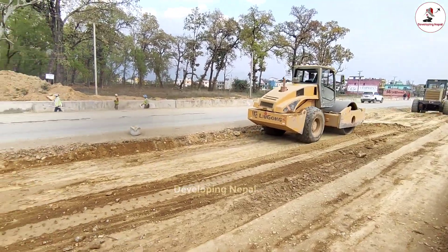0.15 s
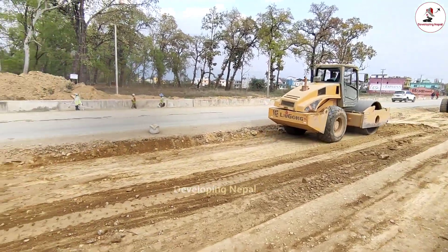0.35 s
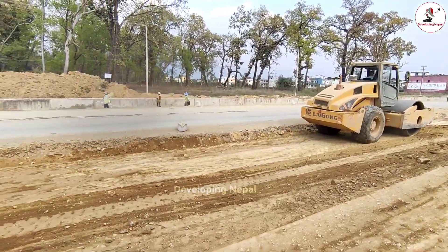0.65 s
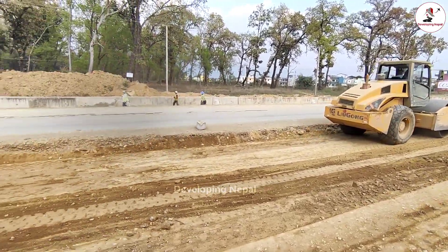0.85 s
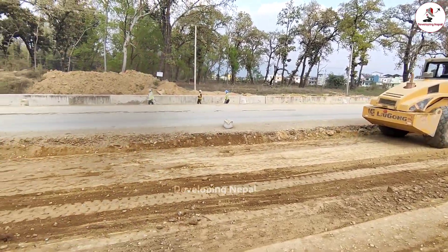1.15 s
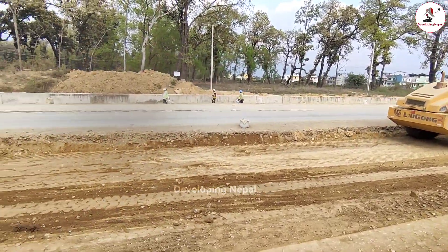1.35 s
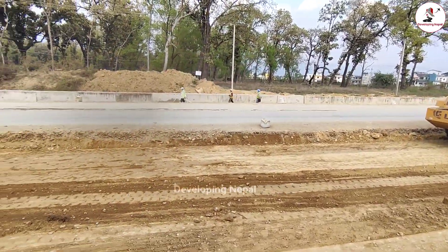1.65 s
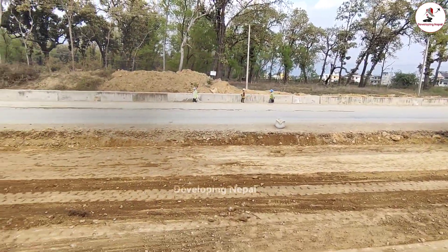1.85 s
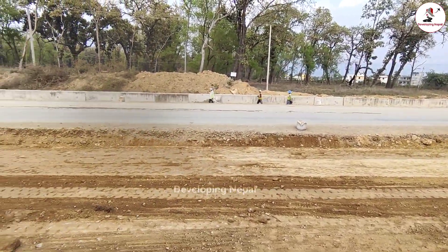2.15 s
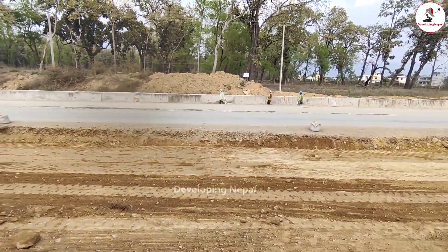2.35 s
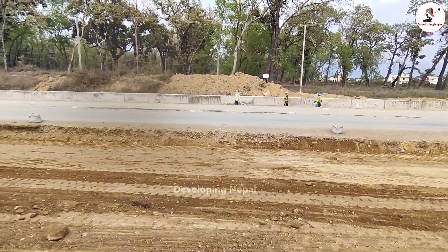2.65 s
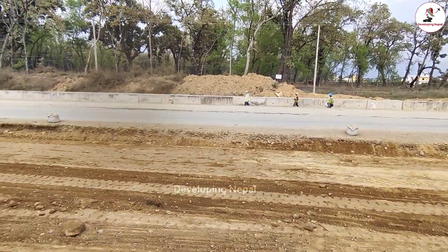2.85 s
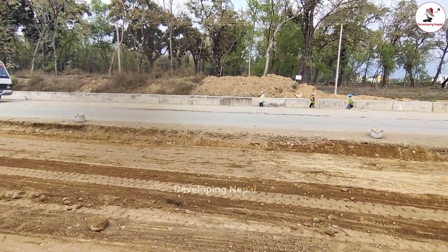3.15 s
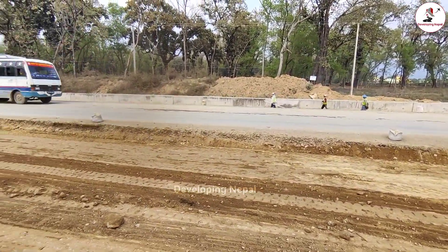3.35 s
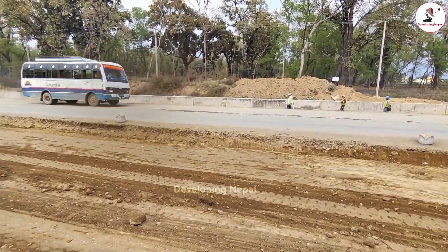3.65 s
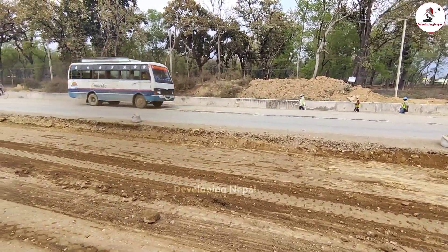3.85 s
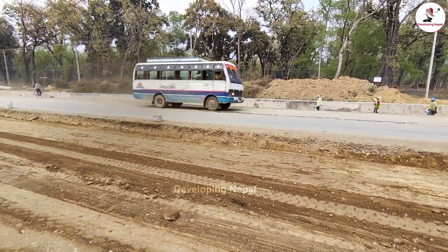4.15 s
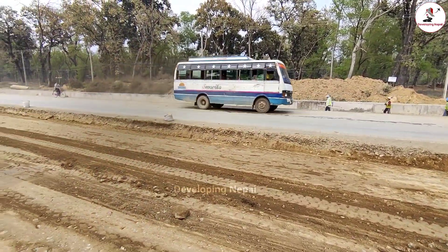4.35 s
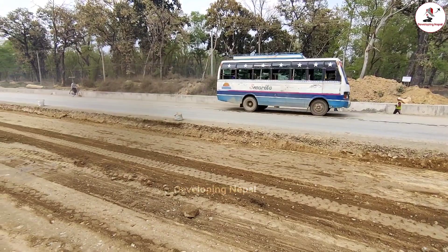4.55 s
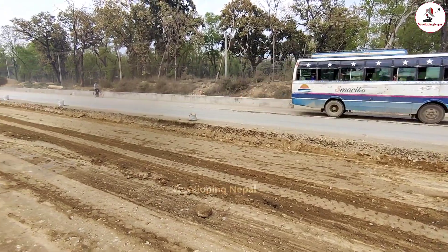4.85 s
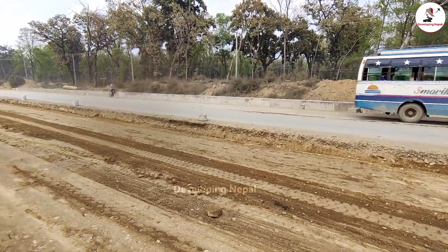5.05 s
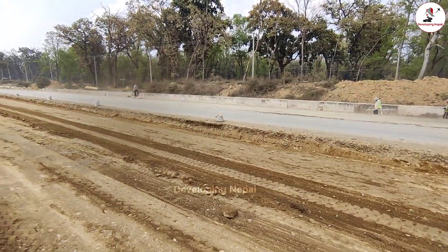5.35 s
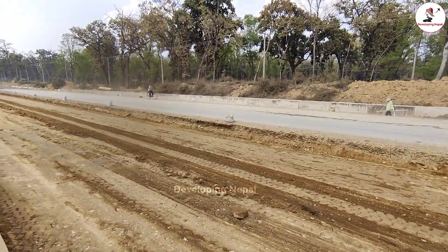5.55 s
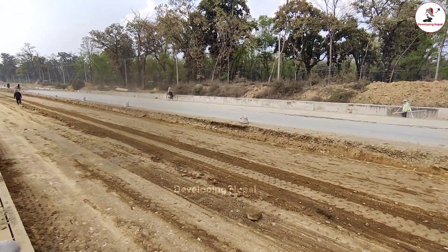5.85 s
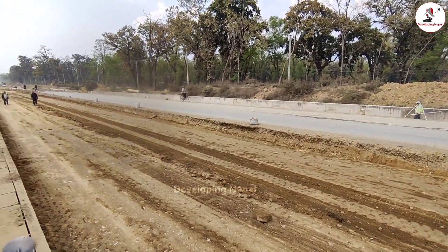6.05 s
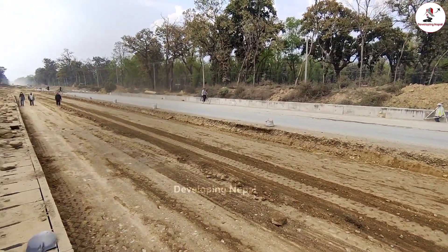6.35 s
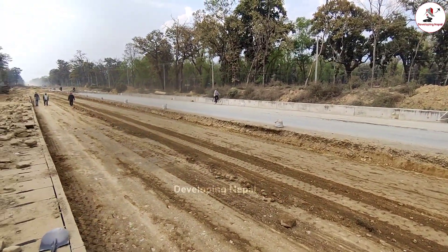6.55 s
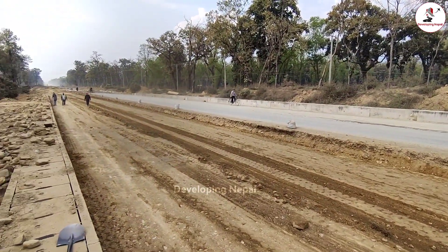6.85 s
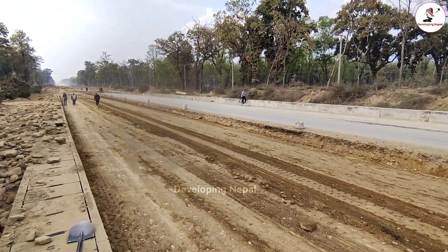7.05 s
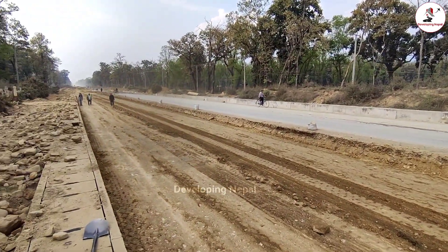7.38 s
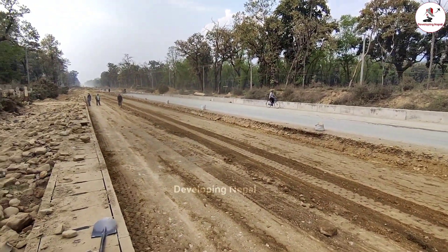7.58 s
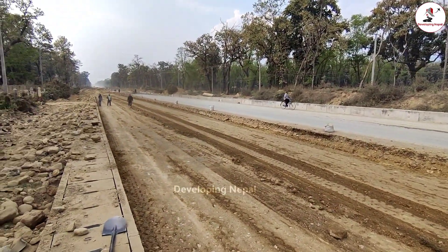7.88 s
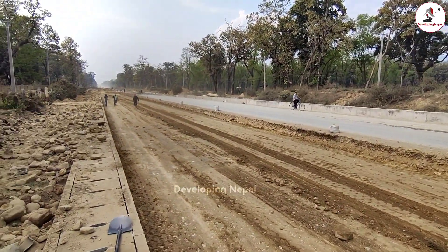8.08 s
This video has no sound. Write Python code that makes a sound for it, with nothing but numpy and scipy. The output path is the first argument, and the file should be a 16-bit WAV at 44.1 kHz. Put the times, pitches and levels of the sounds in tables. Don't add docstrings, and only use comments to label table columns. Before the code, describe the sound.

An open-air roadworks heard from one handheld microphone. From 0 seconds a heavy diesel roller dominates with a steady low drone around 100 hertz, buzzy overtones, hard engine knock, deep drum vibration and a hydraulic whine strongest before 1.5 seconds. A second machine throttles back at about 0.4 seconds and fades. As the microphone turns away, knock and whine soften; brief panel whines and short, shifting ground and wall echoes colour the roar and hiss. Around 4.2 seconds the drum vibration is let go and runs down, and the roller's drone drops sharply. A bus emerges from 3 seconds, its tyre rush peaking near 4.4 and deep exhaust boom near 5.1, then recedes. From 5.4 seconds a small motorcycle rises, roughly buzzing and wavering in pitch, peaking in pitch near 6.1 and continuing to the end, about 8.2, over a lighter engine drone, dull rumble and airy hiss.

```python
import sys
import numpy as np
from scipy import signal
from scipy.fft import rfft, irfft, next_fast_len
from scipy.io import wavfile
from scipy.ndimage import uniform_filter1d, map_coordinates

SR = 44100
rng = np.random.default_rng(int(sys.argv[2]) if len(sys.argv) > 2 else 0)


def inscribe(sig):
    pcm = np.round(np.clip(np.atleast_2d(sig).T, -1, 1) * 32767)
    wavfile.write(sys.argv[1], SR, pcm.astype(np.int16))


def gain_from_decibels(decibels):
    exponent = np.asarray(decibels, float) / 20
    return 10 ** exponent


N = 362502

# t/s, firing f/Hz, firing tone level/dB
ENGINE = [(0, 102.5, -21), (1.8, 102.8, -20), (2.4, 102.3, -20.5), (2.9, 102.2, -19.5), (3.5, 102.2, -19.5),
          (3.9, 102.6, -22), (4.2, 103.6, -26), (4.6, 108.3, -33), (5.2, 107.7, -33), (5.8, 105.8, -29),
          (6.9, 108.7, -28), (7.5, 108, -29), (8.22, 108.6, -31)]
# t/s, turn (0 roller, 1 down the road), extra path via ground/m, echo share/0-1,
# nearness/dB, phase lost at the bounce/turns
VIEW = [(0, 0.042, 0.037, 0.3, -4.5, 0.0076), (.4, 0.087, 0.07, 0.6, -2.5, 0.051),
        (.7, 0.078, 0.079, 0.4, -1.5, 0), (1, 0.099, .105, .55, -1, 0), (1.25, 0.11, 0.115, 0.4, -1, 0),
        (1.6, .2, 0.13, 0.4, 0, 0.035), (2, 0.21, .148, 0.7, -1.5, 0.046),
        (2.4, 0.25, .156, 0.5, -0.5, 0.013), (3, 0.32, .165, 0.4, -2.5, 0.16),
        (3.6, 0.36, .16, 0.35, -2, 0.14), (4.2, 0.47, .162, 0.2, -1, 0), (4.8, 0.69, .16, 0.1, -1, .05),
        (5.4, 0.64, 0.158, 0.35, -2, 0.093), (5.75, 0.72, .162, 0.2, -1.5, 0.16),
        (6.1, 0.82, .168, 0.3, -1.5, 0.18), (6.5, 0.84, .176, 0.4, -2.5, 0.34),
        (7, 0.87, .166, 0.3, -2.5, 0.36), (7.5, 0.84, .156, 0.3, -3, 0.45),
        (8.22, 0.88, .146, 0.4, -3, 0.48)]
SOUND_M_PER_S = 343
CUT_S = 0.027


def unit(x):
    return x / np.sqrt(np.mean(x ** 2) + 1e-20)


def along(points, hz):
    f, v = np.transpose(points)
    return np.interp(np.log(hz + 1), np.log(f + 1), v)


def curves(rows, t=None):
    s, *cols = np.transpose(rows)
    at_s = np.arange(N) / SR if t is None else t
    return [np.interp(at_s, s, c) for c in cols]


def wobble(rate_hz):
    t = np.arange(0, N + 64, 64) / SR
    knots = rng.standard_normal(int(N * rate_hz / SR) + 4)
    return np.interp(np.arange(N) / SR, t, map_coordinates(knots, [t * rate_hz]))


def tone(hz, db, drift_hz, flutter_db, pace_hz=5):
    turns = np.cumsum(hz + drift_hz * wobble(pace_hz)) / SR
    level = np.sqrt(2) * gain_from_decibels(db + flutter_db * wobble(pace_hz))
    return level * np.sin(2 * np.pi * (turns + rng.random()))


def rush(colour, level, echo, patchy_db):
    hz, t, z = signal.stft(rng.standard_normal(N), SR, nperseg=2048)
    keep = hz < 8000
    band_hz = hz[keep, None]
    db = colour(band_hz, t)
    db = db - 10 * np.log10(np.sum(gain_from_decibels(2 * db), axis=0) / len(hz))
    db = db + level(t) + echo(band_hz, t)
    field = uniform_filter1d(rng.standard_normal(db.shape), size=16, axis=0)
    field = uniform_filter1d(field, size=6, axis=1)
    gain = np.pad(gain_from_decibels(db + patchy_db * unit(field)), ((0, len(hz) - keep.sum()), (0, 0)))
    return signal.istft(z * gain, nperseg=2048)[1][:N]


def surge(hz):
    # t/s, f/Hz
    panels = [(.07, 306), (.12, 258), (.22, 310), (.3, 204), (.36, 389), (.48, 261), (.67, 386), (.72, 258),
              (.78, 206), (1, 407), (1.02, 204), (1.09, 260), (1.35, 515), (1.37, 452), (1.4, 261),
              (1.51, 310), (1.65, 508), (1.66, 450), (1.92, 306), (1.93, 261), (1.95, 516), (1.97, 452),
              (2.22, 448), (2.23, 509), (2.41, 208), (2.86, 206), (3.03, 204), (3.42, 305), (3.54, 180),
              (3.83, 513), (4.23, 518), (4.67, 495), (4.84, 369)]
    reach_hz, lift_db, half_s, lull_db = 9, 6, .09, -1.5
    t = np.arange(N) / SR
    near = [s for s, panel_hz in panels if abs(panel_hz - hz) < reach_hz]
    return lull_db * bool(near) + sum(lift_db * np.exp(-((t - s) / half_s) ** 2) for s in near)


def exhaust():
    # order per engine cycle, level/dB, change as the pipe turns away/(dB/s)
    orders = [(6, 0, 0), (12, -4, -2), (18, -8, -1.2), (24, -14, -1), (30, -13, .35)]
    throttle_off_s, overtones_die_db_per_s = 4.9, 12
    t = np.arange(N) / SR
    firing_hz, firing_db = curves(ENGINE)
    cycle_hz = firing_hz / 6
    off_load_db = overtones_die_db_per_s * np.clip(t - throttle_off_s, 0, None)
    out = 0
    for k, db, change in orders:
        level_db = firing_db + db + surge(k * cycle_hz[0]) + change * t - (k > 6) * off_load_db
        out = out + tone(k * cycle_hz, level_db, k / 30, k / 24)
    return out


def knock():
    # t/s, level/dB
    knock_level = [
        (0, -37.5),
        (1.4, -44),
        (2.3, -43.5),
        (4, -49),
        (4.6, -62),
        (8.22, -66),
    ]
    # order per engine cycle, level/dB
    pattern = [(36, -6), (42, -5), (46, 0), (47, -3), (50, -8), (51, -8), (53, -3), (54, -6), (57, -7),
               (60, -14), (61, -11), (66, -4), (68, -9), (70, -8), (72, -11), (77, -13), (79, -11),
               (81, -12), (86, -15)]
    t = np.arange(N) / SR
    cycle_hz = curves(ENGINE)[0] / 6
    angle = 2 * np.pi * np.cumsum(cycle_hz + .006 * wobble(5)) / SR

    def partial(k, db):
        return gain_from_decibels(db) * np.sin(k * angle + 2 * np.pi * rng.random())

    middle = sum(partial(k, db) for k, db in pattern if 52 < k < 73)
    outer = sum(partial(k, db) for k, db in pattern if not 52 < k < 73)
    sinking = gain_from_decibels(-4 * np.clip(t - 1, 0, None))
    level_db = curves(knock_level)[0] + 1.5 + wobble(5)
    return np.sqrt(2) * gain_from_decibels(level_db) * (outer + sinking * middle)


def drum():
    # t/s, f/Hz, level/dB
    weight = [
        (0, 30.7, -38),
        (4.15, 30.7, -39),
        (4.4, 29.5, -46),
        (4.7, 25, -55),
        (6, 15, -80),
    ]
    hz, db = curves(weight)
    return tone(hz, db, .05, .3) + tone(2 * hz, db + 2, .3, 3)


def pump():
    # t/s, f/Hz, level/dB
    piston = [
        (0, 260.5, -27),
        (.6, 260.5, -24.5),
        (1.4, 260.5, -25.5),
        (2.3, 260.5, -35),
        (4.2, 261, -35),
        (4.9, 260.5, -35),
        (5.5, 260, -50),
    ]
    return gain_from_decibels(surge(piston[0][1])) * tone(*curves(piston), 2, 1.2, 10)


def whines():
    # f/Hz, middle t/s, half length/s, level/dB
    swells = [(388, .35, .35, -26), (408, 1, .25, -27), (372, 4.85, .2, -31), (270, 4.9, .4, -30),
              (288, .7, .1, -27), (380, 1.52, .12, -25), (384, .7, .12, -27), (242, 1.74, .1, -27),
              (346, 2.45, .1, -28), (376, 2.52, .1, -29), (247, 4.62, .1, -27), (177, 4.8, .2, -26),
              (226, 4.74, .1, -26), (263, 6.05, .1, -26), (380, 6.08, .1, -30), (240, 8.15, .12, -24),
              (451, 1.7, .9, -31), (452, 3.7, 1.1, -35), (1482, 3, 1.2, -46), (1345, 3.2, .9, -47),
              (181, 3.55, .3, -26), (490, 4.8, .5, -35)]
    t = np.arange(N) / SR
    return sum(tone(hz, db + surge(hz) - 9 * ((t - s) / half_s) ** 2, 3, 1.5, 12)
               for hz, s, half_s, db in swells)


def roller():
    return exhaust() + knock() + drum() + pump() + whines()


def echo_db(hz, path_m, share, lag=0, mirror_hz=30000):
    turns = hz * path_m / SOUND_M_PER_S - lag
    share = np.clip(share, 0, .9) * np.exp(-(hz / mirror_hz) ** 2)
    return 20 * np.log10(np.abs(1 + share * np.exp(-2j * np.pi * turns)))


def fringes(hz, t):
    # middle t/s, half length/s, f/Hz, glide/(Hz/s), level/dB
    bands = [(2.4, .6, 6350, 698.5, 3), (3.1, .45, 5000, 202.5, -5), (3.3, .3, 3600, 298, -2.5),
             (2.5, .5, 4000, 0, -3), (6.6, .6, 5800, 501, -2.5), (5.6, .4, 3300, 99, -3),
             (4.2, .7, 6700, -1, -2.5), (6.2, .5, 8900, 302, 5), (4.4, .6, 4300, 1, 2.5),
             (1.2, .5, 4600, 598, 5), (.4, .5, 5500, 0, -6.5), (7.8, .5, 4200, 0, -3.5),
             (4.8, .4, 5500, 1, -5), (2.8, 0.43, 650, -2, 1), (2.2, 0.44, 950, 0.5, -4.5),
             (1.6, 0.44, 330, 2.5, -1.5), (2.5, .3, 3650, 1, -3.5), (3.15, .3, 3300, 0, -3),
             (3.3, .5, 3800, -1, 2.5), (3.95, .25, 2650, -1, -4.5), (6, .5, 5700, 99, -4),
             (1.1, .25, 4650, 0.5, -4.5), (7.8, .6, 4650, 0, 4.5), (8, .4, 2450, -1, 4),
             (7, .4, 2850, 1, -2.5), (1.8, .5, 1400, -150, -5.5), (2.9, .35, 1250, -2, 2.5),
             (3.7, .35, 1400, -2, 2), (5.25, .35, 1330, 0, -3.5), (3.95, 0.33, 930, 3, 2),
             (4, .5, 630, -0.5, -2), (0.92, .3, 900, 1, 2.5), (4, .6, 5800, 0.5, -1.5),
             (6.1, .5, 6300, -0.5, 3), (5.1, .4, 2650, 0.5, 2.5), (1.5, .6, 2600, 300.5, -3.5),
             (7.2, .5, 1400, 0, 1.5), (7.5, .7, 760, 2, -2), (.3, .3, 3800, 1, 2.5), (6, .4, 830, 1, 1)]
    hz, t = hz.astype(np.float32), t.astype(np.float32)
    out = 0
    for s, half_s, mid_hz, glide, db in bands:
        width = .05 * (5000 / mid_hz) ** .5
        off_centre = hz / (mid_hz + glide * (t - s)) - 1
        out = out + db * np.exp(-((t - s) / half_s) ** 2 - (off_centre / width) ** 2)
    return out


def wall(hz, t):
    # t/s, extra path/m, share/0-1
    wall_path = [(0, 0.13, 0.6), (.7, 0.093, 0.1), (1.2, 0.12, 0.3), (1.7, 0.17, 0.4), (2.1, 0.13, 0),
                 (2.7, 0.14, 0.23), (3.2, 0.13, 0.24), (3.7, 0.1, 0.18), (4.2, 0.1, 0.35),
                 (5.3, 0.14, 0.25), (6.2, 0.16, 0.11), (7, 0.12, 0.65), (7.6, 0.14, 0.58),
                 (8.22, 0.12, 0.92)]
    # t/s, extra path/m, share/0-1
    kerb_path = [(0, 0.12, 0.1), (.8, .158, 0.1), (1.7, .172, 0.3), (2.3, .186, 0.2), (2.9, .19, 0),
                 (3.5, .187, .35), (4.2, .19, 0.1), (5, .19, 0), (5.8, .19, 0.4), (6.6, .19, 0.3),
                 (7.3, .19, .05), (8.22, .19, .05)]
    # t/s, level/dB
    hollow_level = [
        (1.2, 0),
        (2.1, -5.5),
        (3.4, -7),
        (4.3, 0.5),
        (5.4, -0.5),
        (7, -1.5),
        (8.22, -6.5),
    ]
    kerb_hz, hollow_hz, hollow_wide_hz = 3820, 1049, 69.6
    path_m, share = curves(kerb_path, t)
    kerb = echo_db(hz, path_m, share / (1 + (kerb_hz / (hz + 1)) ** 6))
    hollow = curves(hollow_level, t)[0] * np.exp(-((hz - hollow_hz) / hollow_wide_hz) ** 2)
    return echo_db(hz, *curves(wall_path, t), mirror_hz=2000) + kerb + hollow + fringes(hz, t)


def echoes(strength):
    soil_hz, flat_gain = 8000, 3.5

    def echo(hz, t):
        turn, path_m, share, _, lag = curves(VIEW, t)
        mirror_hz = soil_hz * (1 + flat_gain * turn ** 3)
        return echo_db(hz, path_m, strength * share, lag, mirror_hz) + wall(hz, t)
    return echo


def turning(spectra):
    turns = [0, 0.54, 1]

    def colour(hz, t):
        turn = curves(VIEW, t)[0]
        return sum(np.interp(turn, turns, row) * along(points, hz) for row, points in zip(np.eye(3), spectra))
    return colour


def shelf(hz):
    # from f/Hz, to f/Hz, level/dB
    weak_bands = [(2750, 3562, -1), (3562, 4790, -7), (4790, 5860, -5)]
    return sum(db * ((hz > low) & (hz <= high)) for low, high, db in weak_bands)


def steady(spectrum):
    return lambda hz, t: along(spectrum, hz) + shelf(hz) + 0 * t


def roar():
    # f/Hz, level/(dB per Hz)
    facing = [(20, -40), (46, -27), (56, -23.5), (85, -5.5), (125, -6.5), (150, -8), (185, -7), (225, -6),
              (258, -3), (390, -3.5), (435, -6.5), (520, -11.5), (570, -22), (680, -17), (930, -18.5),
              (1550, -32.5), (2600, -97)]
    # f/Hz, level/(dB per Hz)
    side_on = [(30, -35.5), (85, -6.5), (135, -6), (180, -5), (240, -5.5), (280, -11), (330, -11.5),
               (450, -11.5), (520, -10), (570, -12), (680, -15.5), (1000, -31), (2400, -85)]
    # f/Hz, level/(dB per Hz)
    away = [(20, -52), (35, -34), (48, -29.5), (58, -12), (85, -11), (110, -2), (135, -8), (180, -3),
            (245, -5.5), (290, -12), (490, -16.5), (545, -23), (620, -22), (800, -23), (1400, -33.5),
            (2300, -61.5), (4000, -120)]
    low_cut = signal.butter(3, 44, "high", fs=SR, output="sos")

    def level(t):
        return -18 + curves(VIEW, t)[3]

    noise = rush(turning([facing, side_on, away]), level, echoes(0.6), patchy_db=0.0)
    return gain_from_decibels(.4 * wobble(6)) * signal.sosfilt(low_cut, noise)


def hiss():
    # f/Hz, level/(dB per Hz)
    air_front = [(650, -31), (1100, 1.5), (1500, -5.5), (2200, -9.5), (2870, -8.5), (3500, -11.5),
                 (4200, -13.5), (5000, -10.5), (5800, -10), (6500, -12), (7500, -9.5), (9000, -50.5)]
    # f/Hz, level/(dB per Hz)
    air_side = [(650, -36.5), (1100, 5), (1500, 2), (2300, -4), (2950, -11), (3950, -7.5), (4650, -16.5),
                (7500, -16)]
    # f/Hz, level/(dB per Hz)
    air_away = [(650, -37), (1100, 1.5), (1550, 0), (2150, -10), (2870, -12), (4000, -17), (5100, -8.5),
                (6200, -16), (7500, -11)]
    throb = gain_from_decibels(.55 * wobble(24) + .3 * wobble(60) + .25 * wobble(10))
    turned = turning([air_front, air_side, air_away])

    def colour(hz, t):
        return turned(hz, t) + shelf(hz)

    def level(t):
        return -32 + 1.45 * curves(VIEW, t)[3]

    return throb * rush(colour, level, echoes(1), patchy_db=.6)


def grader():
    # f/Hz, level/(dB per Hz)
    machine = [(270, 2.5), (600, -12), (1000, 3), (1350, -6.5), (1600, -11.5), (2250, -10), (2700, -27),
               (7500, -21)]
    off_s, drop_db, fades_db_per_s = 0.42, -5, 7

    def level(t):
        drop = drop_db * np.clip((t - off_s) / CUT_S, 0, 1)
        return -24.5 + drop - fades_db_per_s * np.clip(t - off_s, 0, None)

    return rush(steady([(120, -34.0)] + machine), level, wall, patchy_db=0.3)


def bus():
    # t/s, firing f/Hz, level/dB
    boom = [(0, 52.4, -41), (.8, 53.4, -36), (2, 55.8, -35), (3.2, 58.2, -26), (3.65, 58.9, -30),
            (3.9, 59.1, -24), (4.4, 59.4, -20), (4.7, 59.7, -20.5), (5.1, 59.4, -17), (5.6, 58.8, -21.5),
            (6.2, 59, -26.5), (6.45, 58.6, -33), (6.8, 58, -44), (7.25, 58.7, -37), (8.22, 58.8, -55)]
    return tone(*curves(boom), .15, .4)


def tyres():
    # loudest t/s, hidden t/s, level/dB, extra ground path/m
    passes = [
        (4.33, 4.54, -28.5, 0.18),
    ]
    # f/Hz, level/(dB per Hz)
    tread = [(700, -28), (1000, 8), (1400, 7), (2200, -5.5), (3000, -26.5), (4000, -21.5), (5000, -32),
             (7500, -15)]
    # f/Hz, level/(dB per Hz)
    engine_bay = [(350, -23.5), (520, 1.5), (700, -7), (900, 2), (1050, -9), (1300, -32.5)]
    in_earshot_s, emerges_db_per_s = 3.16, 5.5
    nears_db_per_s, hidden_db, leaves_db_per_s = 1, -6, 5
    nearest_s, passing_s = 4.33, 0.94
    road_share, road_lag_turns = 0.48, 0.13

    def passing(loudest_s, hidden_s, db, path_m):
        def level(t):
            masked = emerges_db_per_s * np.clip(in_earshot_s - t, 0, None)
            coming = nears_db_per_s * np.clip(loudest_s - t, 0, None)
            leaving = leaves_db_per_s * np.clip(t - hidden_s, 0, None)
            hiding = hidden_db * np.clip((t - hidden_s) / CUT_S, 0, 1)
            return db - masked - coming - leaving + hiding

        def echo(hz, t):
            return echo_db(hz, path_m, road_share, road_lag_turns) + wall(hz, t)

        return rush(steady(tread), level, echo, patchy_db=.7)

    def distance(t):
        return -27.5 - 20 * np.log10(1 + ((t - nearest_s) / passing_s) ** 2)

    return sum(passing(*row) for row in passes) + rush(steady(engine_bay), distance, wall, patchy_db=.5)


def motorcycle():
    # t/s, f/Hz, level/dB, next order level/dB
    revs = [(5, 150, -42, -44), (5.35, 158, -30, -33), (5.5, 165, -21, -27), (5.65, 179, -21, -26),
            (5.8, 185, -25, -25), (5.95, 193, -24, -21), (6.1, 210, -24, -30), (6.25, 203, -27, -34),
            (6.4, 178, -26, -32), (6.55, 180, -30, -30), (6.7, 180, -23, -27), (6.85, 183, -26, -25),
            (7.1, 190, -26, -27), (7.45, 190, -27, -27), (7.6, 187, -24, -29), (7.75, 180, -23, -27),
            (7.95, 186, -28, -26), (8.22, 180, -30, -25)]
    hz, db, next_db = curves(revs)
    return tone(hz, db - 1.5, 3.5, 2, 18) + tone(hz * 5 / 4, next_db - .5, 5, 2, 22)


def scene():
    return (roller() + roar() + hiss() + grader() + bus() + tyres() + motorcycle())[None]


def top_cut(x):
    return signal.sosfilt(signal.butter(12, 8700, fs=SR, output="sos"), x)


def record(dry):
    top_hz = 7545
    rounded = dry / (1 + np.abs(dry) ** 5) ** (1 / 5)
    m = next_fast_len(N)
    in_band = np.fft.rfftfreq(m, 1 / SR) < top_hz
    kept = irfft(rfft(rounded, m) * in_band, m)[:, :N]
    return top_cut(kept)


dry = scene()
out = record(dry)
inscribe(out)
```